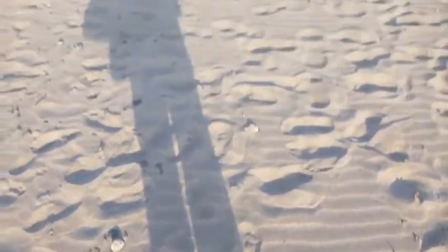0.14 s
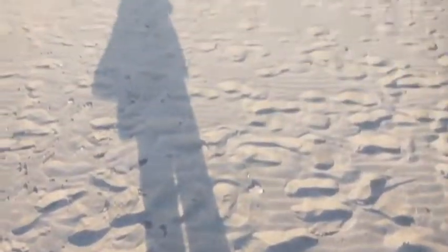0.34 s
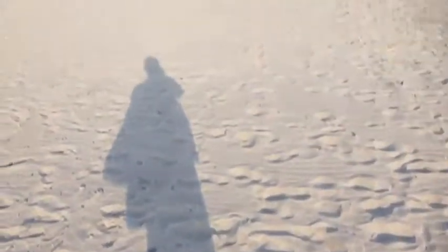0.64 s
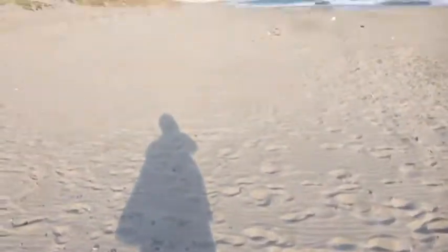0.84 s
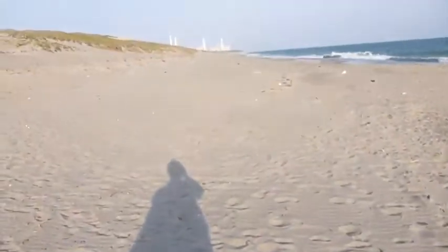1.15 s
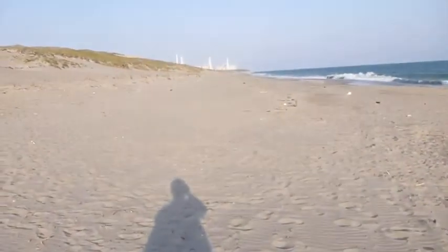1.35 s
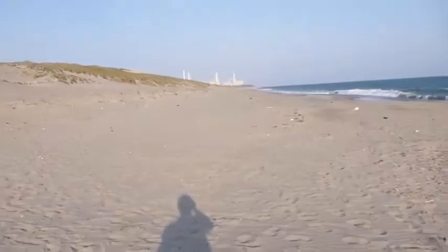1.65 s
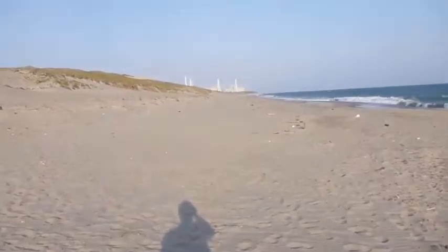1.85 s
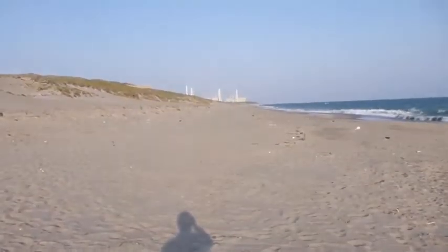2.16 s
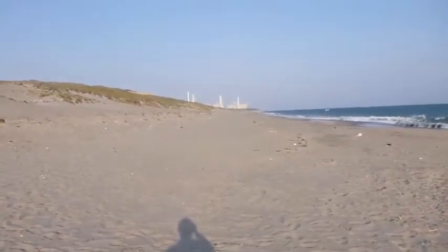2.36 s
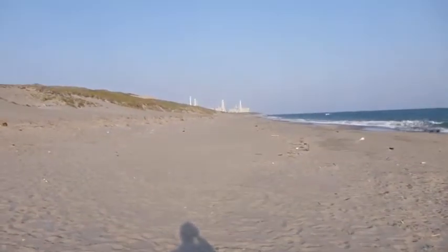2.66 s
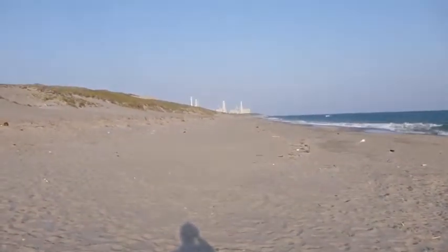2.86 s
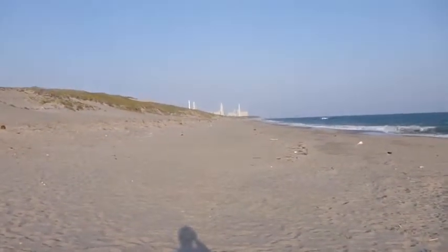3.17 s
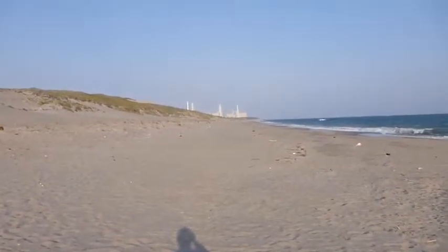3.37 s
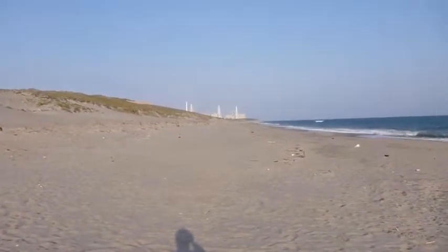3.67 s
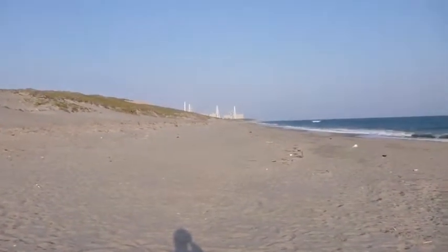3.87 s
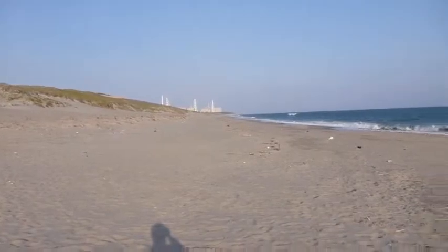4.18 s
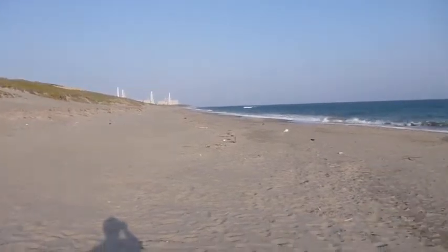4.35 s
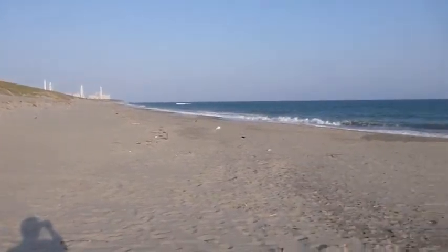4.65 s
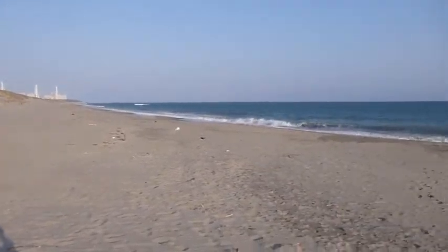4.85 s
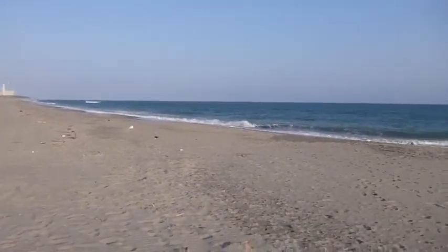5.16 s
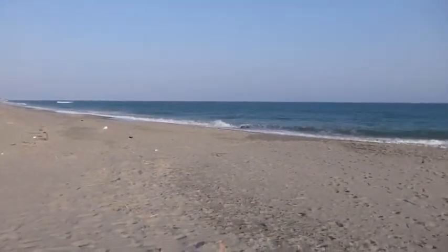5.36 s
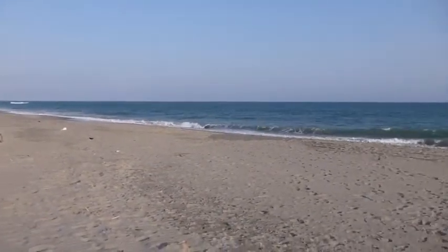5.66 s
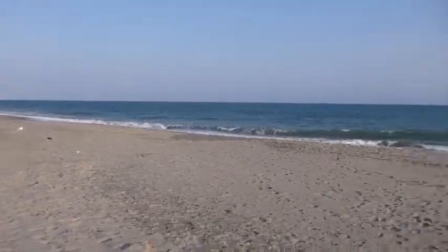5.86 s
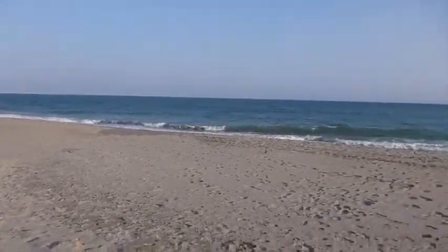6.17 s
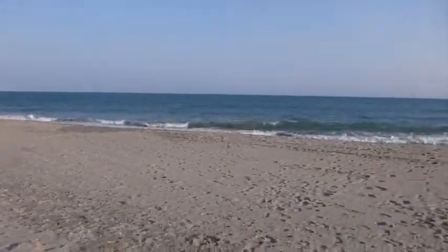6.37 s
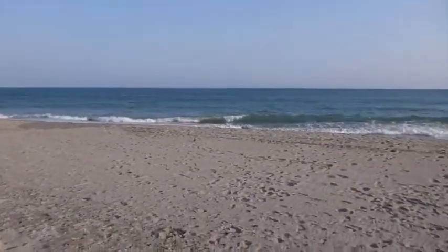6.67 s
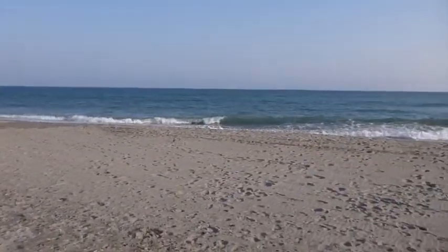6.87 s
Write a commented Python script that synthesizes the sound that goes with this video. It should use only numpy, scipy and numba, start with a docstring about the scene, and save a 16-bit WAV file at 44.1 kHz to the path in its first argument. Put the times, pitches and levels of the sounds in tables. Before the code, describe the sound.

On an open sandy beach, waves break some way down the shore as a steady, diffuse rush, full in the mids with a soft fizzing top, slightly uneven but never a single crash. A small thump and puff arrive at 0.7 s, then at about 0.8 s a hard gust strikes the hand-held microphone: very loud, muffled, low roaring buffets and thumps, overloaded, strongest from 0.9 to 1.3 s and collapsing by 1.6 s. The surf is pushed down by the automatic level and remains faint around 2 to 3 s. Short wind puffs and dull bumps continue to about 4.3 s, notably near 2.2, 3.6 and 4.1 s, over a weak rumble. From 4.5 to 6 s it is calmer, mostly wash. Around 6.2 to 6.7 s a low, almost humming wind flutter and a few soft thumps return while the surf swells fuller and closes at 7 s.

```python
"""On a sandy beach, surf breaks in a steady rush, heard from up the shore through a hand-held camera.
The surf is noise with bubble pops, coloured as white water and churned octave by octave.
Wind carries eddy noise past the microphone, faster when stronger: a breeze, one hard gust and short puffs.
Large eddies add a low rumble, and single compact eddies thump the membrane.
The camera's gain control ducks the surf under the gust and lets it swell back."""
import sys
import numpy as np
from scipy import signal
from scipy.fft import rfft, irfft, next_fast_len
from scipy.io import wavfile
from scipy.ndimage import map_coordinates
from numba import njit

SR = 44100
rng = np.random.default_rng(int(sys.argv[2]) if len(sys.argv) > 2 else 0)


def pcm_store(signal):
    """Save signal as 16-bit PCM."""
    levels = np.round(np.clip(np.atleast_2d(signal), -1, 1) * 32767)
    wavfile.write(sys.argv[1], SR, levels.astype(np.int16).T)


N = 309582
TIME = np.arange(N) / SR  # s

# breaking waves: (time [s], relative level [dB], brightness [dB per two octaves])
BREAKING_WAVES = [(0, -40.7, 0), (0.4, -40, -0.5), (0.8, -41.5, -1), (1.3, -43.5, -1.7), (1.9, -47.5, -1),
                  (2.35, -51, -0.8), (2.68, -48, -1.1), (2.95, -51, -1), (3.5, -48.5, 0), (3.75, -49, -2),
                  (4.3, -49.5, -0.7), (5.1, -47.4, 0), (5.7, -45, -0.6), (6.4, -42.5, -2.4),
                  (7.02, -42, -0.5)]
# spectrum of the rushing white water: (frequency [Hz], relative density [dB])
WHITE_WATER_SPECTRUM = [(20, -55), (50, -29), (100, -16.5), (160, -8.5), (240, -1), (600, 0.5),
                        (1000, -2.5), (1450, -10), (2500, -12), (3800, -19.5), (7500, -27.5),
                        (10700, -28.5), (13000, -27), (15500, -34)]

# wind under the gusts: (time [s], turbulence level [dB], level of slow eddies round the hand [dB],
# regular vortex shedding against the turbulence [dB])
BREEZE = [(0, -45.5, -56.5, -3), (.65, -46, -56.5, -2.5), (1.1, -39, -27, -3.5), (1.7, -40.5, -36, -14),
          (2.4, -40.5, -41, -18), (3.0, -47, -45.5, -12), (4.1, -44.5, -40, -15), (4.55, -50, -47, -11.5),
          (4.9, -40, -57, -2.5), (5.5, -46, -54.5, 2.5), (6.15, -34.5, -49, 15), (6.6, -37.5, -48.5, -5.5),
          (7.02, -39.5, -56, -15)]
# the one hard gust: (time [s], level [dB])
HARD_GUST = [(.8, -42), (.822, -12), (.9, -10), (.96, 0), (1.07, 2), (1.16, -6), (1.26, 0), (1.32, -9),
             (1.43, -14), (1.52, -12), (1.57, -31)]
# short puffs of wind: (start [s], hold [s], level [dB])
PUFFS = [(0.703, 0.0085, -29), (0.831, 0.023, -10), (0.874, 0.0081, -1), (.938, 0.026, 3),
         (1.225, 0.051, 1.5), (1.495, 0.024, -9), (1.602, 0.031, -20), (1.798, 0.034, -26),
         (2.192, .01, -31), (2.321, 0.031, -26.5), (2.424, 0.014, -31), (2.561, 0.046, -31),
         (2.743, 0.022, -29), (2.816, 0.038, -25), (3.031, 0.014, -33), (3.162, 0.14, -32.5),
         (3.219, 0.021, -27.5), (3.42, 0.033, -27), (3.553, 0.034, -28), (3.664, 0.029, -20),
         (3.816, 0.096, -29.5), (3.963, 0.055, -31.5), (4.057, 0.014, -31), (4.136, 0.0657, -25.5),
         (4.275, 0.0094, -32), (4.612, 0.021, -39), (5.763, .025, -31.5), (6.051, .025, -29),
         (6.222, 0.069, -21), (6.413, 0.013, -30), (6.455, 0.021, -29), (6.516, .012, -29.5),
         (6.717, 0.068, -31), (7.002, 0.027, -26.5)]
PUFF_ATTACK_S, PUFF_RELEASE_S = .009, .014
# turbulence in a moderate breeze: (frequency [Hz], relative density [dB])
EDDY_SPECTRUM = [(15, -34), (40, -22), (85, -7.5), (170, 1), (310, 0.5), (470, -6.5), (680, -14.5),
                 (1100, -22.5), (2000, -34), (5000, -61)]
# above a calm breeze, eddy pitch climbs with the wind's level
CALM_DB, CALM_HZ, DB_PER_OCTAVE = -33, 247.8, 41
# the hard gust's front arrives faster than the air behind, and settles
FRONT_OCTAVES, FRONT_S = .8, .085
BREEZE_HZ, BREEZE_DB = 270, -30  # pitch at which eddies pass at unit speed; level of a fluttering breeze

# large slow eddies round the hand and camera: (frequency [Hz], relative density [dB])
RUMBLE_SPECTRUM = [(15, -38), (40, -22), (90, -2), (150, -0.5), (250, -10), (600, -48), (3000, -76)]
# single eddies that thump the microphone: (time [s], level [dB], swing rate [Hz])
THUMPS = [(0.713, -11, 292), (0.818, 9, 593), (1.015, 5, 600), (1.364, 7, 330.5), (1.397, -2.5, 397),
          (1.518, 2, 434), (1.5981, -9.5, 436), (1.687, -8, 181), (1.7992, -7, 420), (2.2051, -12.5, 320),
          (2.3378, -9.5, 352), (2.8519, -20, 340.8), (3.16, -19.5, 487), (3.424, -12.5, 345),
          (3.56, -8, 596), (3.583, -4, 490.3), (3.6697, -24, 296.2), (3.9636, -12.5, 471),
          (4.1342, -12, 423.7), (6.22, -8.5, 306.5), (6.283, -13, 329), (6.417, -17, 320.2),
          (6.6295, -13, 406.5), (6.7199, -11.5, 308)]

# narrow dips in the camera's response: (frequency [Hz], width [Hz])
RESPONSE_DIPS = [(2885, 270), (7830, 120), (11700, 1020)]
TOP_HZ = 15720  # upper limit of the camera's response


def undb(db):
    """Amplitude gain is ten to the power of decibels over twenty."""
    return 10 ** (np.asarray(db) / 20)


def unit(x):
    """Normalisation: divide by the root mean square."""
    return x / np.sqrt(np.mean(x ** 2))


def curves(table):
    """Linear interpolation of each column of a table over time."""
    times, *columns = np.transpose(table)
    return [np.interp(TIME, times, column) for column in columns]


def colour(x, spectrum):
    """Spectral shaping: weight each frequency by a curve on a log-frequency axis; rms 1."""
    hz, db = np.transpose(spectrum)
    size = next_fast_len(len(x))
    bin_hz = np.maximum(np.arange(size // 2 + 1) * SR / size, 1)
    gain = undb(np.interp(np.log(bin_hz), np.log(hz), db))
    return unit(irfft(rfft(x, size) * gain, size)[:len(x)])


def walk(rate):
    """Random modulation: straight lines between `rate` random values a second, rms 1."""
    knots = rng.standard_normal(4096)
    return unit(map_coordinates(knots, [TIME * rate], order=1, mode="wrap"))


def surf(level_db=10.0, churn_db=0.6, patchy_db=0.5, fizz_db=-9, bubble_spread_db=3):
    """Superposition of bubbles: countless small ones make a wash, louder ones pop singly."""
    wave_db, bright_db = curves(BREAKING_WAVES)
    pops = rng.standard_normal(N) * (rng.random(N) < 2500 / SR)  # about 2500 a second
    pops *= undb(bubble_spread_db * np.minimum(rng.exponential(size=N), 4))
    wash = rng.standard_normal(N)
    rest = colour(wash + undb(fizz_db) * unit(pops), WHITE_WATER_SPECTRUM)
    water = 0
    # peel off one octave at a time, from the bottom up
    for hz in 250 * 2 ** np.arange(7):
        lowpass = signal.butter(2, hz, fs=SR, output="sos")
        band = signal.sosfiltfilt(lowpass, rest)
        rest = rest - band
        # brightness tilts the treble of the foam against the roar of the breakers
        tilt = np.log2(hz / 2500) / 2
        water = water + band * undb(bright_db * tilt + patchy_db * walk(25))
    return water * undb(level_db + wave_db + churn_db * walk(13))


def wind_strength():
    """Incoherent addition: the powers of breeze, hard gust and puffs sum to the wind's level in dB."""
    breeze_db, _, _ = curves(BREEZE)
    gust_db = np.interp(TIME, *np.transpose(HARD_GUST), left=-np.inf, right=-np.inf)
    power = undb(breeze_db) ** 2 + undb(gust_db) ** 2
    for start, hold, db in PUFFS:
        early = np.maximum(start - TIME, 0)
        late = np.maximum(TIME - start - hold, 0)
        # exponential rise, hold and exponential decay
        decay = np.minimum(early / PUFF_ATTACK_S + late / PUFF_RELEASE_S, 20)
        power = power + undb(db) ** 2 * np.exp(-2 * decay)
    return 10 * np.log10(power)


def eddy_pitch(wind_db):
    """Advection: stronger wind carries eddies faster, with an extra rise at the hard gust's front."""
    age = TIME - HARD_GUST[0][0]
    front = FRONT_OCTAVES * (age > 0) * np.exp(-(age / FRONT_S) ** 2)
    climb = np.maximum(wind_db - CALM_DB, 0) / DB_PER_OCTAVE
    return CALM_HZ * 2 ** (climb + front)


def wind(flutter_db=3.5, gale_flutter_db=2.5, shedding_q=1.8):
    """Frozen turbulence: a fixed pattern of eddies passes the microphone, higher in faster air."""
    wind_db = wind_strength()
    _, _, shedding_db = curves(BREEZE)
    travel = [np.cumsum(eddy_pitch(wind_db) / BREEZE_HZ)]
    eddies = colour(rng.standard_normal(2 * N), EDDY_SPECTRUM)
    wake = colour(rng.standard_normal(2 * N), EDDY_SPECTRUM)
    # the edge of the housing sheds vortices at a nearly regular rate
    wake = unit(signal.lfilter(*signal.iirpeak(BREEZE_HZ, shedding_q, fs=SR), wake))
    eddies = map_coordinates(eddies, travel, order=3, mode="wrap")
    wake = map_coordinates(wake, travel, order=3, mode="wrap")
    shedding = undb(shedding_db)
    pressure = (eddies + shedding * wake) / np.hypot(1, shedding)
    # a breeze comes in short packets, a hard gust blows more evenly
    depth_db = np.interp(wind_db, [BREEZE_DB, 0], [flutter_db, gale_flutter_db])
    flutter = unit(undb(depth_db * walk(110)))
    return pressure * flutter * undb(wind_db)


def rumble(sway_db=3.0):
    """Large-scale turbulence: big eddies rock the air at the port, a low, swaying bed."""
    _, rumble_db, _ = curves(BREEZE)
    slow_eddies = colour(rng.standard_normal(N), RUMBLE_SPECTRUM)
    return slow_eddies * undb(rumble_db + sway_db * walk(18))


def thumps(cycles=0.35):
    """Pressure impulse: each compact eddy sucks and then pushes the membrane in one swing."""
    out = np.zeros(N)
    for time, db, hz in THUMPS:
        near = np.abs(TIME - time) < .02
        turn = (TIME[near] - time) * hz
        envelope = 1 / np.cosh(turn / cycles * np.pi / 2)
        out[near] += undb(db) * np.sin(2 * np.pi * turn) * envelope
    return out


@njit
def gain_control(x, threshold, attack_db, release_s, sense_hz):
    """Feedback: output bass over the threshold turns the gain down; it then creeps back."""
    y, bass, cut_db = np.empty(len(x)), 0., 0.
    for i in range(len(x)):
        y[i] = x[i] * 10 ** (-cut_db / 20)
        bass += (y[i] - bass) * 2 * np.pi * sense_hz / SR
        over = np.tanh(max(abs(bass) / threshold - 1, 0.))
        cut_db += (attack_db * over - cut_db / release_s) / SR  # attack in dB per second
    return y


def scene(port_hz=800):
    """Low-pass filtering: the narrow microphone port muffles wind pressure; the surf adds to it."""
    port = signal.butter(2, port_hz, fs=SR, output="sos")
    buffeting = signal.sosfilt(port, wind() + thumps() + rumble())
    return (surf() + buffeting)[None]


def record(dry, threshold_db=-28.5, attack_db=220, release_s=0.28, sense_hz=450):
    """Gain control, clipping at full scale, then band-limiting by the camera's dips and top cut."""
    y = gain_control(dry[0], float(undb(threshold_db)), float(attack_db), float(release_s), float(sense_hz))
    y = np.clip(y, -1, 1)
    for hz, width in RESPONSE_DIPS:
        y = signal.lfilter(*signal.iirnotch(hz, hz / width, fs=SR), y)
    top_cut = signal.ellip(10, .2, 70, TOP_HZ, fs=SR, output="sos")
    return signal.sosfilt(top_cut, y)[None]


dry = scene()
out = record(dry)
pcm_store(out)
```